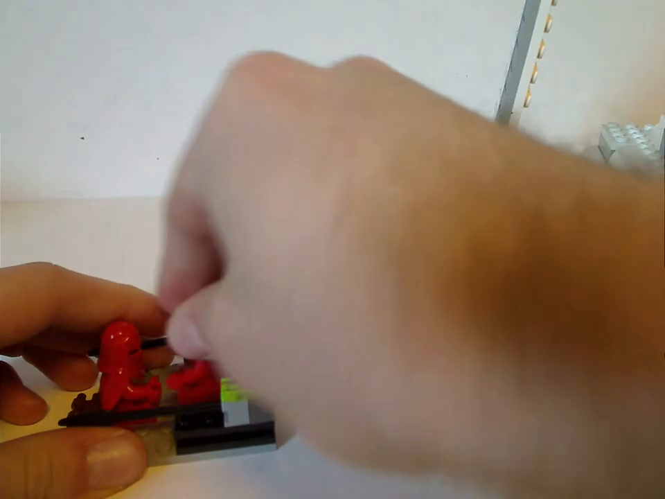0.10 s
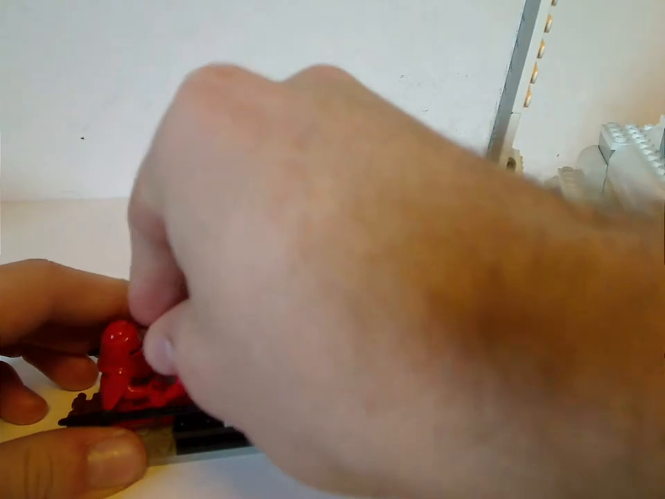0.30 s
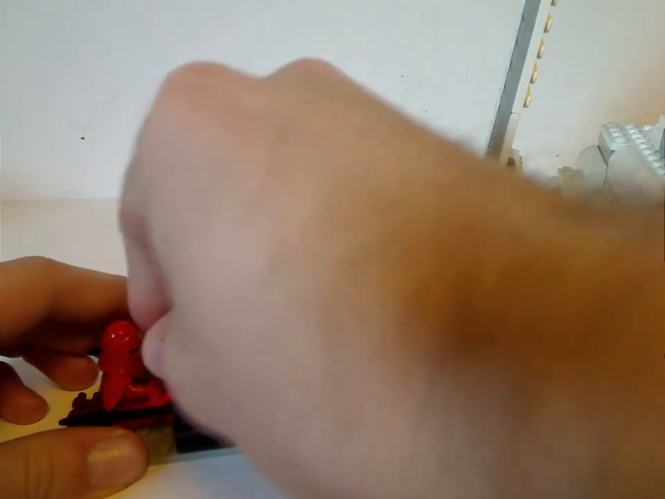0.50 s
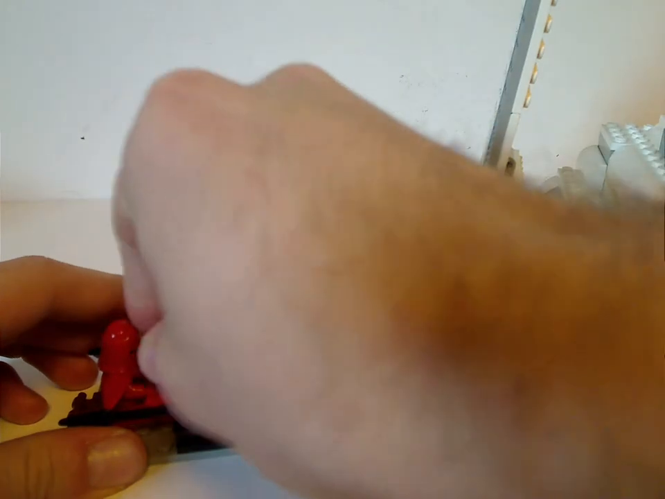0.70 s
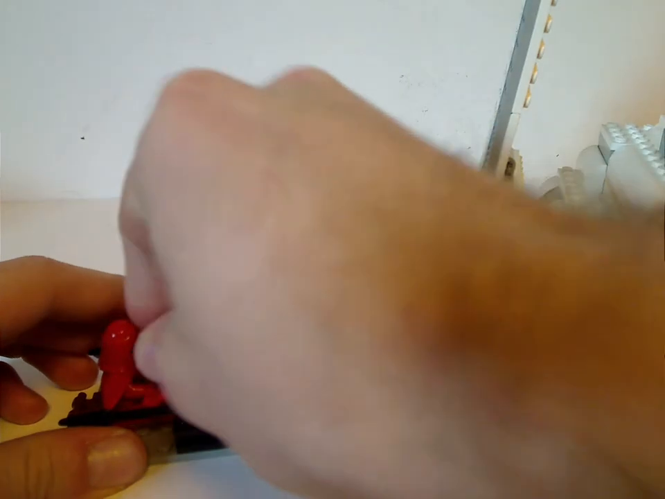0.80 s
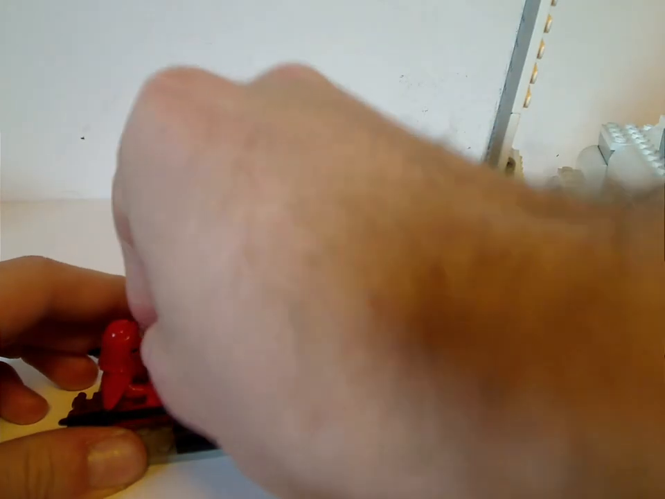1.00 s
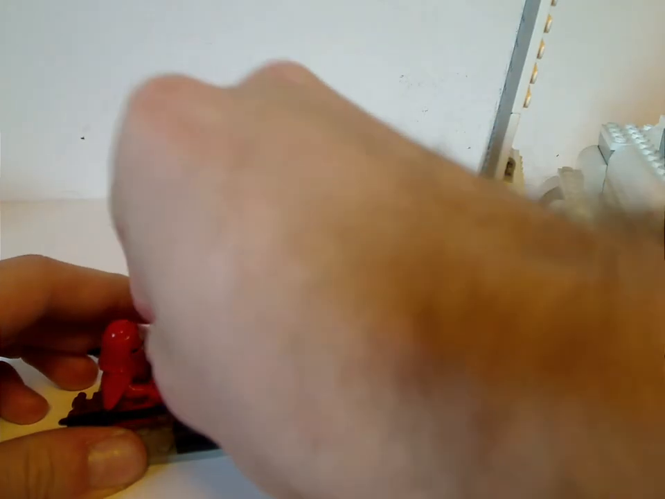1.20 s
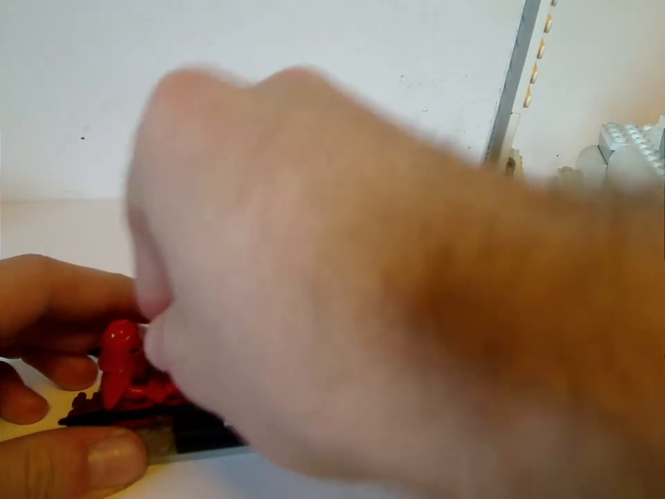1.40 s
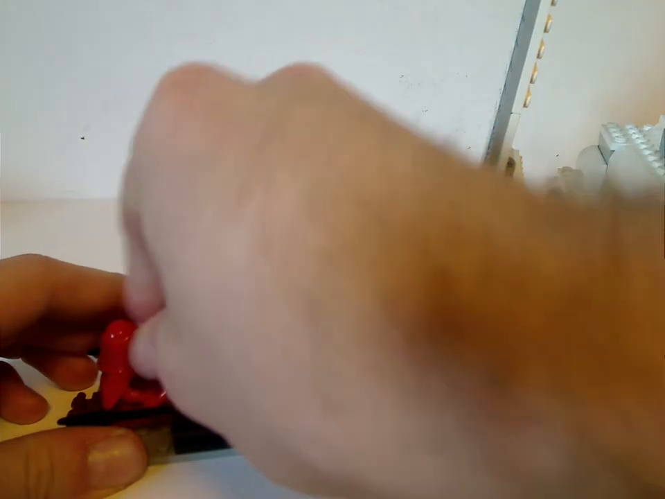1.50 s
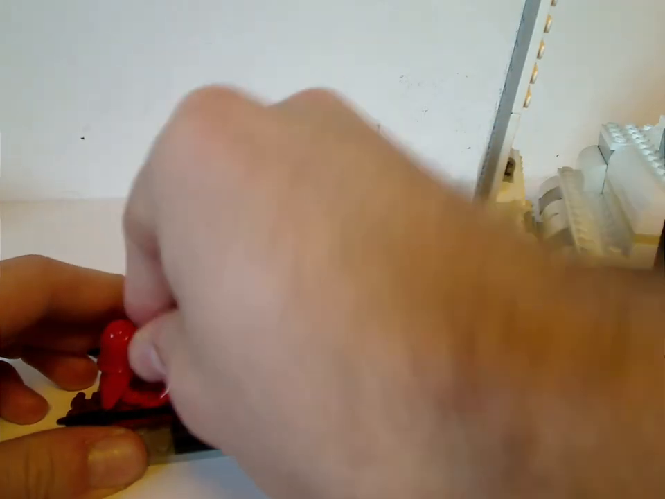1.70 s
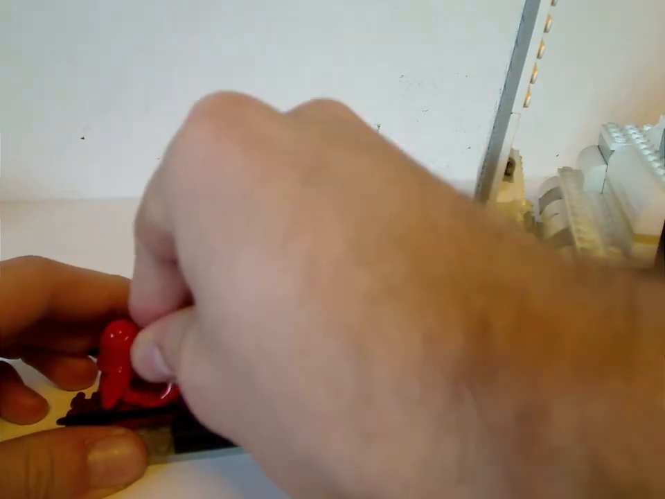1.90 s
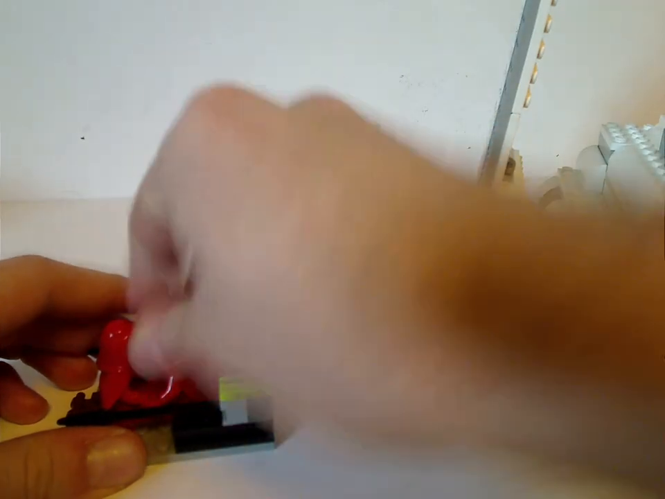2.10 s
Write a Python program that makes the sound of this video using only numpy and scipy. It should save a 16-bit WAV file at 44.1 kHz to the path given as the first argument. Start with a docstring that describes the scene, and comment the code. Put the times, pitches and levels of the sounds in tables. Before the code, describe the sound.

Light plastic clicks and short rubs sound close up as fingers press small toy figures onto a hollow brick stand. A firm click lands at about 0.7 seconds, with a very soft squeak just before it and another near 1 second. More ticks and scrapes follow from 1.1 to 1.6 seconds, then a piece snaps home loudly at 1.7. Faint room hiss and a thin electric whine run throughout.

```python
"""Fingers press small plastic figures onto a brick stand on a table in a small room.
Light clicks and short rubs ring the hollow modes of the bricks; each click leaves a diffuse tail.
A firm click lands at 0.73 s, between two soft squeaks of a sliding stud.
More clicks and rubs follow, then one stud snaps home loudly at 1.72 s.
Room hiss and a faint electric whine run throughout."""
import sys
import numpy as np
from scipy import signal
from scipy.fft import rfft, irfft
from scipy.io import wavfile

SR = 44100
rng = np.random.default_rng(int(sys.argv[2]) if len(sys.argv) > 2 else 0)


def materialize(psi):
    """Save the field psi as 16-bit PCM at rate SR to the path in sys.argv[1].

    A 1-D psi becomes a single channel; in a 2-D psi each row is a channel.
    """
    bounded = np.clip(np.atleast_2d(psi).T, -1, 1)
    quanta = np.round(bounded * 32767).astype(np.int16)
    wavfile.write(sys.argv[1], SR, quanta)


N = 93403

# Bands 0-5: table, hollow, low-mid, wall ring, upper, treble (edge [Hz])
BAND_EDGES = [60, 480, 1100, 2200, 3300, 6500, 17000]
# Modes of stand and table (frequency [Hz], gain [dB], t60 [s])
MODES = [(95, -10.5, 0.039), (168, -6.5, 0.029), (306, -4, 0.015), (760, -1, 0.012), (900, -6.5, 0.0053),
         (1350, -9, 0.0085), (1790, -15.5, 0.0081), (2543, -4.5, 0.016), (2848, -5, 0.0051),
         (3800, 0, 0.0049), (5052, -2, 0.0012), (7410, 2.5, 0.0024), (9730, -1.5, 0.00391),
         (13760, -4.5, 0.0034)]
TOP_MODE, TOP_LOSS_DB = len(MODES) - 1, -17  # gentle clicks and rubs hardly reach it
GRIP_COLUMN = {3: 6, 5: 7, 9: 8}  # mode: click column with its pitch
OUTWARD_MODES = (4, 8, 9)  # the rest start inwards
FIRM_DB, FIRM_CONTACT_S, SOFT_CONTACT_S = -23, 0.0005, 0.00093
# Clicks (time [s], 5 levels in bands 1-5 [dB], 3 pitches of gripped modes [Hz])
CLICKS = [(0.001, -53, -37.5, -43, -39.5, -43.5, 666, 1350, 3170),
          (0.013, -53, -37, -46, -36.5, -40.5, 726, 1390, 3600),
          (0.027, -52.5, -45, -52, -44, -48.5, 1000, 1300, 3680),
          (0.093, -46, -41.5, -37, -35.5, -51.5, 627, 1300, 4850),
          (0.124, -55.5, -32.5, -30.5, -33.5, -50.5, 790, 1300, 4260),
          (0.155, -53, -48, -49.5, -44, -66, 604, 2000, 3520),
          (0.256, -43, -68, -59, -34.5, -55, 730, 1160, 4880),
          (0.282, -40.5, -32, -29.5, -25.5, -47.5, 473, 1360, 5500),
          (0.361, -40, -38, -82, -77, -79, 1004, 1960, 6080),
          (0.46, -45.5, -52, -50.5, -51, -58.5, 687, 1670, 3700),
          (0.531, -47.5, -41.5, -60, -48.5, -87, 1040, 1420, 3680),
          (0.559, -42, -85, -58, -57.5, -71, 660, 1432, 3700),
          (0.712, -44.5, -42, -61, -60, -63, 790, 1270, 4300),
          (0.7322, -20.5, -19, -20, -23.5, -40.5, 732, 1226, 5060),
          (0.7894, -36.5, -23, -43.5, -45, -65, 644, 1780, 4180),
          (0.843, -36, -42, -47, -58.5, -65, 507, 1180, 6360),
          (1.123, -34.5, -31.5, -35.5, -34.5, -45.5, 663, 1160, 3700),
          (1.1286, -42.5, -26.5, -27, -36.5, -39, 704, 1370, 4950),
          (1.18, -34, -35, -37.5, -40.5, -65, 760, 1510, 4500),
          (1.197, -35.5, -26.5, -33, -34.5, -43.5, 760, 1700, 3800),
          (1.2024, -58, -43, -27.5, -34.5, -35, 830, 1520, 3760),
          (1.2291, -57, -62, -42, -46.5, -69, 710, 1910, 3800),
          (1.369, -53, -64, -51, -63, -64, 800, 1520, 3300),
          (1.407, -45, -105, -66, -48, -74, 770, 1180, 3740),
          (1.424, -47.5, -60, -39.5, -33.5, -46, 760, 2170, 3480),
          (1.515, -46, -63, -48.5, -58, -58.5, 760, 1720, 5500),
          (1.548, -35, -34, -44.5, -45, -64, 745, 1240, 5300),
          (1.5535, -36, -36, -39, -36, -44, 570, 1450, 4330),
          (1.7182, -9, -6.5, -6.5, -11, -29, 770, 1266, 3680),
          (1.7194, -25.5, -45, -16, -20.5, -22.5, 780, 1800, 3600),
          (1.7269, -32, -55, -52, -25, -12, 905, 1380, 3720),
          (1.7402, -23.5, -22, -28.5, -24.5, -32, 710, 1190, 3950)]
def clicks():
    """A sharp push and a rough contact, longer when gentle, ring the stand; the grip retunes three modes."""
    out, t = np.zeros(N + 4096), np.arange(400) / SR
    firm_contact = 0.06 * np.exp(-t / FIRM_CONTACT_S)
    soft_contact = 0.25 * t / SOFT_CONTACT_S * np.exp(1 - t / SOFT_CONTACT_S)
    for click in CLICKS:
        firmness = 1 / (1 + amp(2 * (FIRM_DB - max(click[1:6]))))
        contact = firmness * firm_contact + (1 - firmness) * soft_contact
        pushes = contact * rng.standard_normal((len(MODES), len(t)))
        pushes[:, 0] = [1 if k in OUTWARD_MODES else -1 for k in range(len(MODES))]
        for k, (hz, db, t60) in enumerate(MODES[3:], start=3):
            pitch_hz = click[GRIP_COLUMN[k]] if k in GRIP_COLUMN else hz
            sound = signal.fftconvolve(ring(pitch_hz, t60)[:1024], pushes[k] / np.linalg.norm(pushes[k]))
            level_db = db + click[band_of(hz)] + (1 - firmness) * TOP_LOSS_DB * (k == TOP_MODE)
            out[round(click[0] * SR):][:len(sound)] += amp(level_db) * sound
    return highpass(out[:N], hz=450)  # the small stand radiates little bass


# Tails in bands 0-5 (gain on the click [dB], t60 [s], rise [s])
TAILS = [(-28, 0.14, 0.0043)] + [(db, 0.1, 0.0018) for db in (-20.5, -20.5, -27, -30, -36.5)]
def click_tails():
    """Table, loose pieces and room answer each click with noise that swells and dies away."""
    out, starts = np.zeros(N), [round(click[0] * SR) for click in CLICKS]
    for hz, db, t60 in MODES:
        tail_db, tail_t60, rise_s = TAILS[band_of(hz)]
        column = max(band_of(hz), 1)  # the table's thud follows the hollow band
        hits = np.zeros(N)
        hits[starts] = amp([tail_db + click[column] for click in CLICKS])
        decay = signal.lfilter([1], [1, -amp(-60 / (tail_t60 * SR))], hits)
        pole = np.exp(-1 / (rise_s * SR))
        envelope = signal.lfilter([1 - pole], [1, -pole], decay)
        out += amp(db) * damped_mode(envelope * rng.standard_normal(N), hz, t60)
    return out


WEAK_MODE, WEAK_LOSS_DB = 11, -8
# Plastic on plastic (start [s], length [s], 6 levels in bands 0-5 [dB])
RUBS = [(0.067, 0.083, -58.5, -55.5, -49, -56, -51, -67.5), (0.148, 0.095, -72, -65, -62.5, -68, -71, -76),
        (0.252, 0.056, -55, -52, -37, -50.5, -54.5, -67.5), (0.354, 0.046, -76, -51, -48, -78, -82, -95),
        (0.389, 0.059, -66, -55.5, -56.5, -71, -75, -93), (0.998, 0.06, -66.5, -65, -77, -79, -85, -93),
        (1.124, 0.05, -76, -49, -44, -51, -55, -72), (1.171, 0.067, -50.5, -50.5, -42.5, -46, -51.5, -65),
        (1.223, 0.076, -84, -54, -49, -56, -67, -79), (1.297, 0.072, -90, -56, -62, -46, -49, -60.5),
        (1.396, 0.063, -75, -60, -53.5, -56, -60.5, -73.5),
        (1.543, 0.041, -48, -49, -82, -55.5, -55.5, -75), (1.629, 0.13, -85, -74, -56, -60, -63.5, -78),
        (1.732, 0.083, -42.5, -63, -61, -51.5, -56, -72)]
def rubs():
    """Friction drives the modes with shared and separate slips; each rub swells fast and fades slower."""
    out, t, shared = np.zeros(N), np.arange(N) / SR, slips()
    envelopes = np.zeros((6, N))
    for start, length, *levels_db in RUBS:
        progress = np.clip((t - start) / length, 0, 1)
        bell = np.sin(np.pi * progress ** 0.71) ** 2.66
        envelopes += np.outer(amp(levels_db), bell)
    for k, (hz, db, t60) in enumerate(MODES[1:], start=1):
        friction = envelopes[band_of(hz)] * unit_rms(shared + 0.7 * slips())
        loss_db = TOP_LOSS_DB * (k == TOP_MODE) + WEAK_LOSS_DB * (k == WEAK_MODE)
        out += amp(db + loss_db) * damped_mode(friction, hz, t60)
    return out


def slips(per_s=3500, spread_db=3.5):
    """Tiny slips of uneven size at random moments."""
    size = amp(spread_db * np.minimum(rng.exponential(1, N), 3))
    slipping = rng.random(N) < per_s / SR
    return unit_rms(size * slipping * np.sign(rng.standard_normal(N)))


# Squeaks (centre [s], length [s], level [dB], pitch [Hz])
SQUEAKS = [(0.692, 0.033, -55, 967), (0.98, 0.032, -59, 961)]
def squeaks():
    """A sliding stud gives a short soft tone."""
    out, t = np.zeros(N), np.arange(N) / SR
    for centre, length, db, hz in SQUEAKS:
        envelope = np.cos(np.pi * np.clip((t - centre) / length, -0.5, 0.5))
        out += amp(db) * envelope * np.sin(2 * np.pi * hz * t)
    return out


# Hiss spectrum (frequency [Hz], relative density [dB])
HISS_SPECTRUM = [(30, -36), (110, -2.5), (185, 2), (300, -5), (1800, -13.5), (15500, -21.5)]
def hiss(rms_db=-72.5, top_hz=15750):
    """Steady coloured room noise."""
    hz = np.fft.rfftfreq(N, 1 / SR)
    points_hz, points_db = np.transpose(HISS_SPECTRUM)
    colour = amp(np.interp(np.log(hz + 1), np.log(points_hz + 1), points_db)) * (hz < top_hz)
    return amp(rms_db) * unit_rms(irfft(rfft(rng.standard_normal(N)) * colour, N))


WHINE_HZ, FIRST_JUMP_S, JUMP_EVERY_S = 1525.4, 0.025, 0.1
STEADY_HZ, STEADY_DB = 4803, -88
# Whine partials (harmonic number, rms level [dB])
WHINE_PARTIALS = [(1, -74), (2, -79.5), (4, -87), (5, -91)]
def whine():
    """An electric tone with overtones jumps half a cycle at intervals, beside a fainter steady tone."""
    t = np.arange(N) / SR
    phase = 2 * np.pi * WHINE_HZ * t + np.pi * np.floor((t - FIRST_JUMP_S) / JUMP_EVERY_S)
    out = amp(STEADY_DB) * np.sin(2 * np.pi * STEADY_HZ * t)
    for harmonic, db in WHINE_PARTIALS:
        out += amp(db) * np.sqrt(2) * np.sin(harmonic * phase + 2 * np.pi * rng.random())
    return out


def ring(hz, t60, rise_cycles=0.55):
    """Impulse response of one mode that swells briefly and decays, peak 1."""
    t = np.arange(2048) / SR
    swell = (1 - np.exp(-t * hz / rise_cycles)) ** 2
    mode = swell * amp(-60 * t / t60) * np.sin(2 * np.pi * hz * t)
    return mode / abs(mode).max()


def damped_mode(force, hz, t60):
    """A force drives one unit-energy mode, slightly damped by the fingers."""
    mode = ring(hz, 0.97 * t60)
    return signal.oaconvolve(force, mode / np.linalg.norm(mode))[:N]


def band_of(hz):
    return np.searchsorted(BAND_EDGES, hz) - 1


def amp(db):
    return 10 ** (np.asarray(db, float) / 20)


def unit_rms(x):
    return x / np.sqrt(np.mean(x ** 2) + 1e-20)


def highpass(x, hz):
    return signal.sosfilt(signal.butter(3, hz, "high", fs=SR, output="sos"), x)


def scene():
    """Mono sum of handling sounds and background."""
    return (clicks() + click_tails() + rubs() + squeaks() + hiss() + whine())[None]


def record(dry):
    """A small microphone loses the deep bass; a band limit cuts the top treble."""
    band_limit = signal.firwin(511, 16900, window=("kaiser", 9), fs=SR)
    return signal.oaconvolve(highpass(dry, hz=70), band_limit[None], "same")


dry = scene()
out = record(dry)
materialize(out)
```